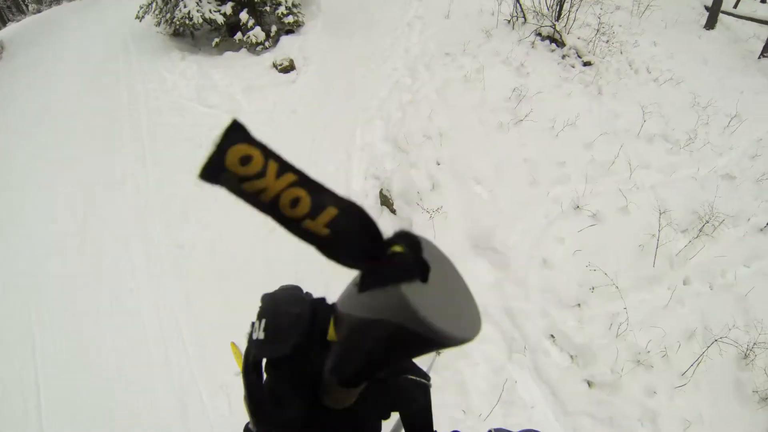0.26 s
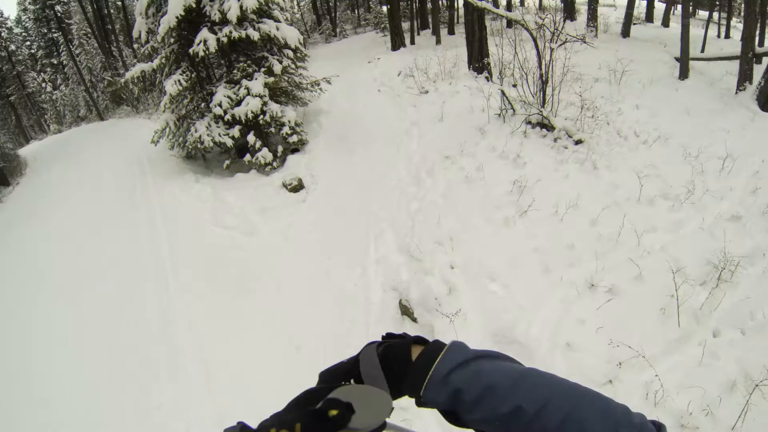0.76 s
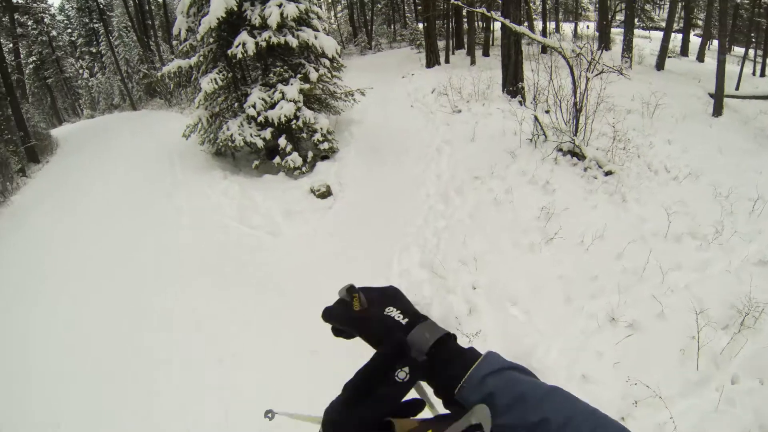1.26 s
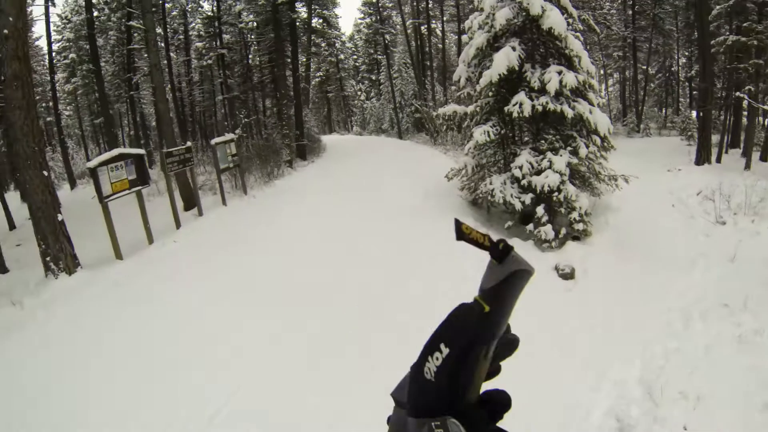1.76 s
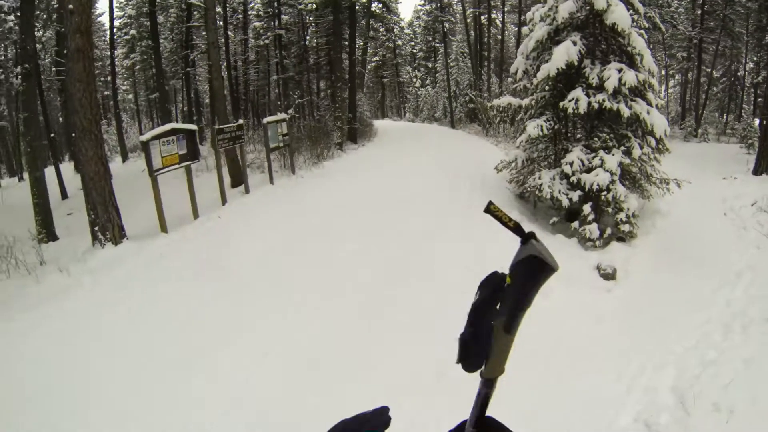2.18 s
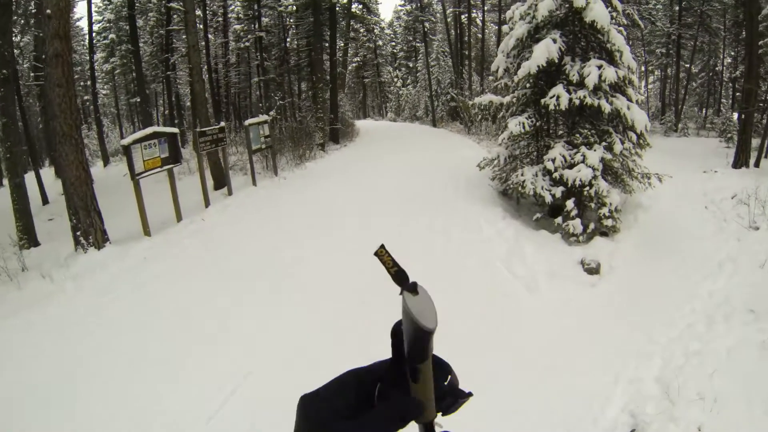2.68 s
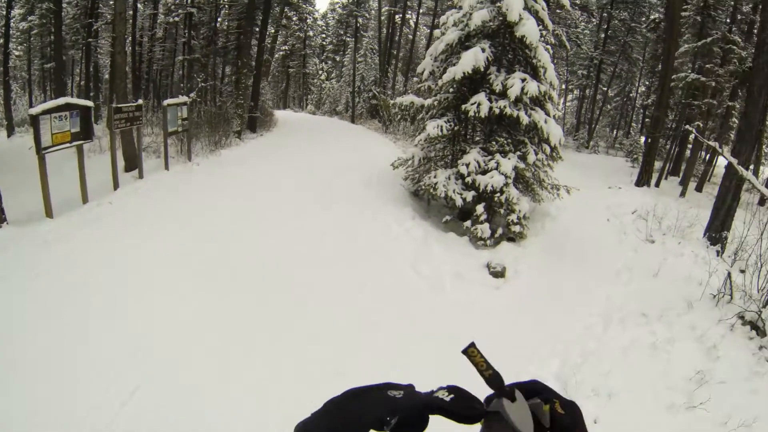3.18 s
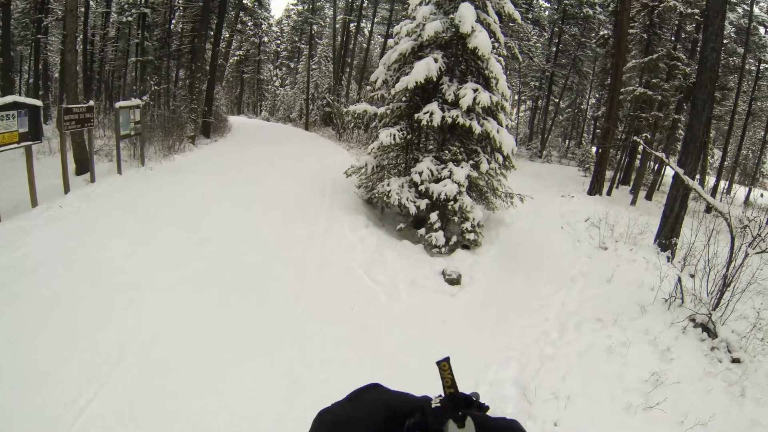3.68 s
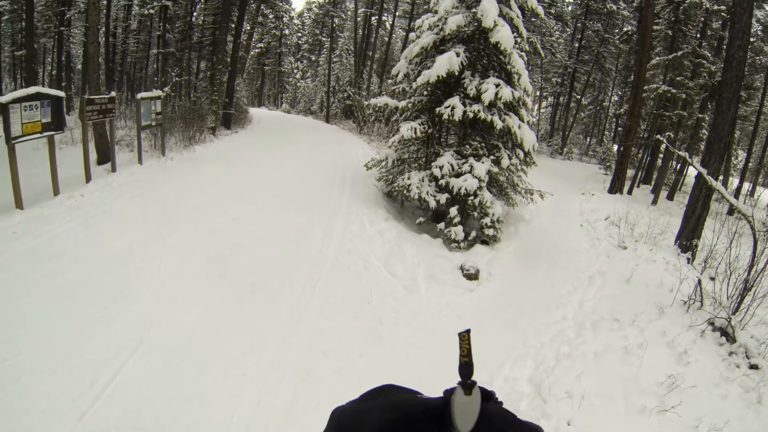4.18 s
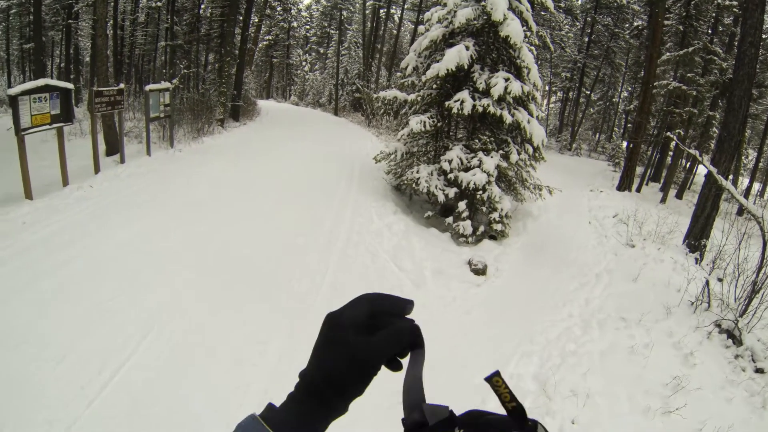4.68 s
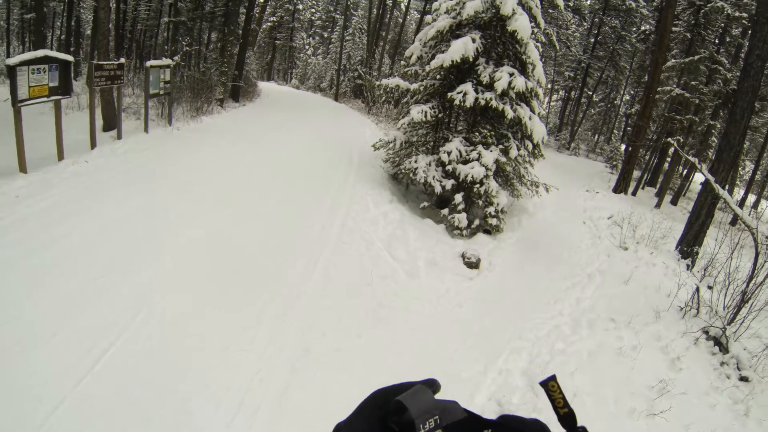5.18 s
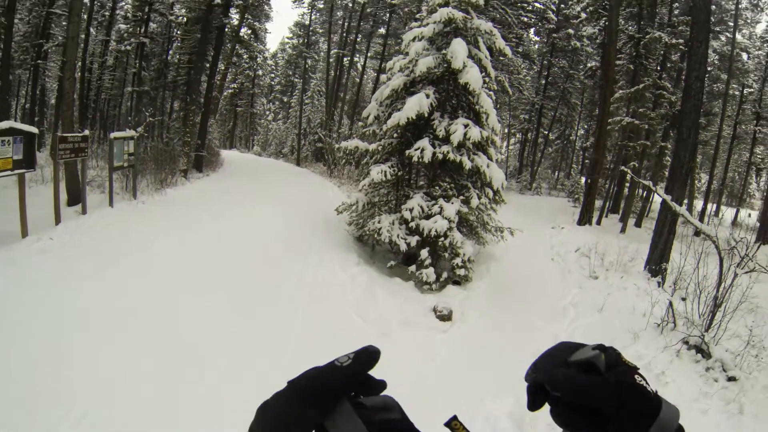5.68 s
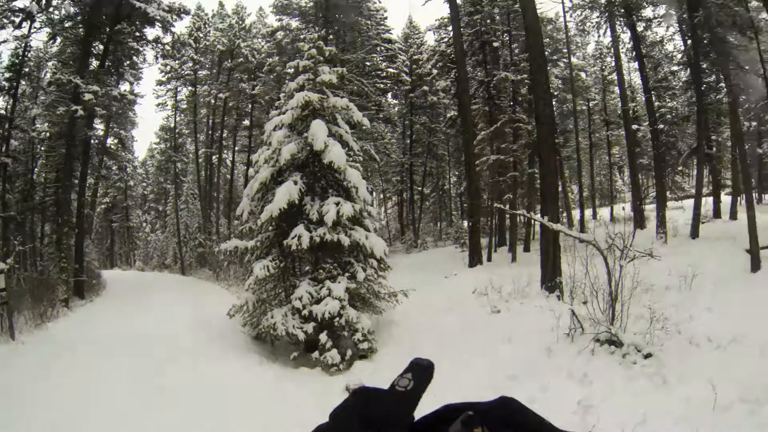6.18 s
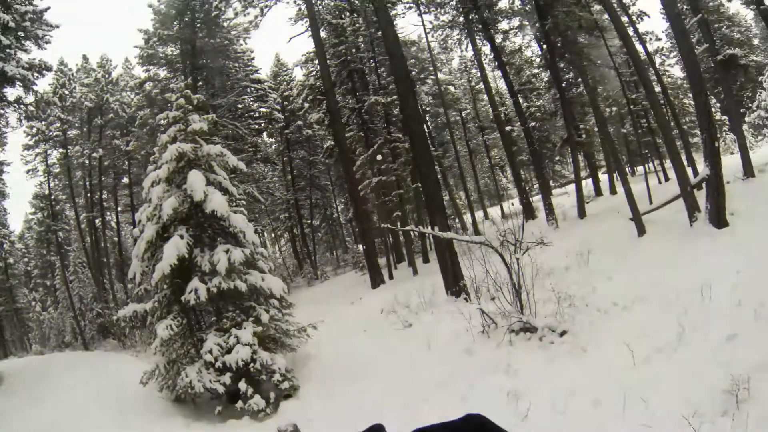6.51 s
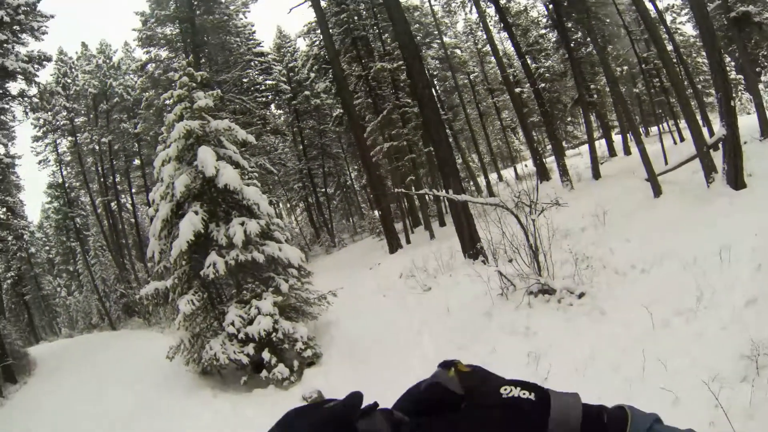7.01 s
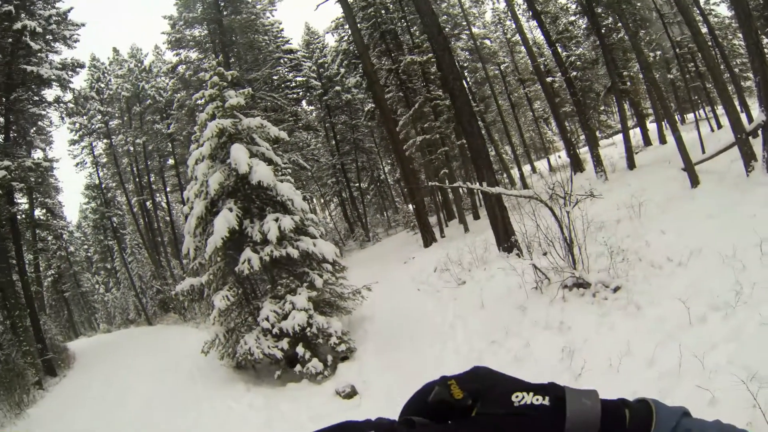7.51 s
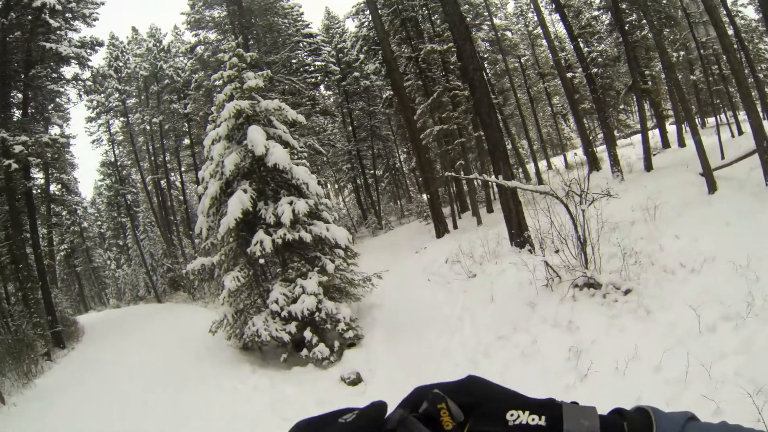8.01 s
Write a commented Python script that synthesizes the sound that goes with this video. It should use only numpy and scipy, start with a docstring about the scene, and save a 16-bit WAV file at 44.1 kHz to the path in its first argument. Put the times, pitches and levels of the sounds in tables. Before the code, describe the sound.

Low wind rumble and faint hiss under four sharp pole taps, a short ski slide, glove rustles and scattered clacks of gear.

```python
"""A skier pauses on a snowy forest trail, heard from a body-worn camera in a plastic case.
Wind rumbles on the case over hiss and a faint whine as four sharp pole taps echo among the trees.
A ski is pushed and glides out, crushing snow. The wind eases; gloves rub, grips and buckles click.
Near 4 s a hook-and-loop strap rips open. A plastic cap clacks, a soft knock rings the case,
and last the snow settles under a ski in four small crunches."""
import sys
import numpy as np
from scipy import signal
from scipy.fft import rfft, irfft, next_fast_len
from scipy.io import wavfile
from scipy.ndimage import uniform_filter1d, map_coordinates

SR = 44100
rng = np.random.default_rng(int(sys.argv[2]) if len(sys.argv) > 2 else 0)


def master(y):
    """Save y as 16-bit WAV."""
    cut = np.clip(np.atleast_2d(y).T, -1, 1)
    pcm = np.round(cut * 32767)  # scale
    wavfile.write(sys.argv[1], SR, pcm.astype(np.int16))


N = 365588

# Noise spectra. Each row: frequency in Hz, relative density in dB.
HISS_SPECTRUM = [(60, 11), (170, 8), (400, 4), (900, 0), (2200, -4.5), (4000, -8), (6500, -12),
                 (8400, -13.5), (10000, -16), (12500, -20), (15000, -27)]
WIND_SPECTRUM = [(10, -12.5), (20, 3.5), (32, -0.5), (50, -7.5), (72, -14), (100, -27), (150, -36.5),
                 (300, -44), (800, -101)]
SNOW_SPECTRUM = [(410, -44), (700, -27), (1050, -19.5), (1310, 0.5), (1410, -5.5), (1590, -1), (1710, -8),
                 (2220, -18), (2430, -15), (2700, -22), (3210, -23.5), (4670, -39), (7000, -51),
                 (9100, -74), (15400, -120)]

# Resonances. Each row: centre in Hz, width in Hz, relative gain in dB.
CASE_MODES = [(1366, 335, -4), (1578, 153, 3), (1970, 130, -13.5), (2250, 230, -9.5), (2830, 880, -25),
              (3223, 545, -2.5), (4790, 590, -12.5), (6300, 1200, -23), (8320, 470, -18.5),
              (9400, 1100, -35), (12000, 5000, -32)]
PACKED_SNOW_MODES = [(1230, 170, 2), (1570, 220, -3), (2300, 600, -23), (3300, 690, -16)]
GRIP_MODES = [(640, 210, -12.5), (1370, 92, 0.5), (1530, 130, -3), (1890, 180, -21), (2210, 250, -12),
              (3260, 440, -14), (4650, 400, -30)]
BUCKLE_MODES = [(1250, 85, -5), (1634, 220, -1), (1930, 160, -9), (2420, 210, -10), (2720, 200, -13),
                (3110, 170, -6.5), (3630, 330, -14), (4550, 310, -17), (5460, 380, -15), (7850, 1100, -22),
                (12500, 3000, -35)]
CAP_MODES = [(1260, 100, -4.5), (1534, 200, 2), (1900, 120, -12), (2360, 170, -15), (3320, 300, -1),
             (3940, 250, -38), (4650, 300, -20), (5530, 440, -30), (7400, 1000, -19), (9200, 520, -36),
             (11150, 900, -27)]
STRAP_MODES = [(1256, 115, -6.5), (1527, 120, 1), (2020, 140, -15), (2300, 120, -6), (2960, 220, -18),
               (3240, 420, 0), (4710, 260, -12), (6500, 420, -19.5), (8120, 480, -20), (9550, 510, -25.5),
               (12300, 2200, -37)]
POLE_MODES = [(850, 85, -22), (1284, 82, 2), (1560, 160, 0.5), (1860, 145, -4.5), (2430, 120, -6.5),
              (2850, 220, -1), (3225, 370, 2), (4800, 160, -21), (5470, 230, -26.5), (7700, 830, -37)]

# Tones of the electronics. Each row: frequency in Hz, level in dB.
WHINE_TONES = [(7027, -61), (14056, -61.5)]
# Air pushed past the case by the body. Each row: peak time in seconds, level in dB.
BODY_SWAYS = [(.24, -20), (.55, -25), (1.33, -22), (1.96, -23), (2.72, -25), (4.63, -26.5), (6.86, -29),
              (7.58, -30)]
# Glove or sleeve rubs. Each row: start in seconds, length in seconds, level in dB.
GLOVE_RUBS = [(1.865, 0.052, -40.5), (1.936, 0.065, -53), (2.52, 0.092, -52), (2.732, 0.15, -47.5),
              (2.895, 0.21, -54.5), (3.098, 0.31, -50.5), (3.392, .4, -56.5), (3.933, 0.049, -46),
              (4.045, .025, -44), (4.232, .28, -53.5), (4.643, 0.061, -47), (5.025, 0.038, -47),
              (5.188, 0.05, -49.5), (5.33, 0.068, -53.5), (6.03, .26, -55), (6.824, 0.43, -54)]
# Snow settling. Each row: start in seconds, level in dB.
SNOW_CRUNCHES = [(7.9294, -44.5), (7.9758, -47.5), (8.0778, -42), (8.1542, -44)]
# Ring of the knocked case. Each row: frequency in Hz, relative level in dB, T60 in seconds.
CASE_KNOCK_MODES = [(1420, -3.5, 0.052), (1490, -32, .02), (1610, 4.5, 0.076), (1910, -14, 0.029),
                    (2250, -5, 0.023), (3400, -11, 0.01)]
# Jolts of the mount. Each row: start in seconds, level in dB, frequency in Hz, T60 in seconds.
MOUNT_JOLTS = [(1.74, -9.5, 73, 0.14), (3.972, -6, 45, 0.1)]
# Light gear contacts, plus the cap clack's short echo off the trees at 6.122 s.
# Each row: start in seconds, level in dB, tilt in dB per octave, scrape in seconds.
CLICKS_AND_ECHO = [(.400, -31, -2.5, 0.0077), (0.4922, -35.5, -1, .0024), (1.6183, -35, 0.5, 0.0057),
                   (1.740, -34, -11, 0.005), (1.7631, -35.5, 0, 0.0012), (2.52, -39.5, -3.5, .01),
                   (2.633, -43, 3, 0.0067), (2.728, -39, 0.5, .009), (2.7692, -41, 1, 0.0061),
                   (3.938, -46, -3, .004), (4.0913, -48.5, 3.5, .0024), (4.2261, -41.5, -3, .0042),
                   (4.3362, -37, -0.5, .0061), (4.8329, -47.5, 4, .002), (5.0844, -48, 5.5, .0023),
                   (6.122, -42, -1, .006), (6.134, -43.5, 1, .008), (6.2963, -42, 3.5, 0.0011),
                   (7.047, -46, -8, .004), (7.4964, -43.5, 1, .01), (8.2364, -44.5, 2, .011)]
# Hard knocks of grip, buckle, cap. Each row: start in seconds, level in dB, scrape in seconds.
GEAR_CLACKS = [(1.728, -25.5, 0.0032), (3.8590, -26, 0.0021), (6.1053, -22, 0.0012)]
# Clumps of hooks tearing free. Each row: start in seconds, level in dB.
HOOK_SNAPS = [(4.1455, -33.5), (4.1532, -28.5)]
# Pole blows. Each row: start in seconds, level in dB, tilt in dB per octave.
POLE_TAPS = [(0.241, -28, -1), (0.5195, -23, -2), (0.7985, -20.5, -2), (1.0728, -15.5, 2)]


def amp(db):
    """Decibels to gain."""
    return 10 ** (np.asarray(db) / 20)


def unit_rms(x):
    """Scale to rms 1."""
    return x / np.sqrt(np.mean(x ** 2) + 1e-20)


def time_s(size=N):
    """Seconds at each sample."""
    return np.arange(size) / SR


def wobble(rate_hz):
    """Smooth random curve, rate_hz knots a second."""
    return map_coordinates(rng.standard_normal(int(N * rate_hz / SR) + 4), [time_s() * rate_hz])


def grains(rate_hz, spread_db):
    """Random impulses of uneven size."""
    hits = rng.random(N) < rate_hz / SR
    return hits * rng.standard_normal(N) * amp(spread_db * rng.standard_normal(N))


def trapezoid(start_s, length_s, attack_s, release_s):
    """Gain that rises, holds at 1 at most and falls to 0 within length_s."""
    t = time_s() - start_s
    return np.clip(np.minimum(t / attack_s, (length_s - t) / release_s), 0, 1)


def add(track, start_s, sound):
    """Mix a sound in at start_s."""
    span = track[round(start_s * SR):][:len(sound)]
    span += sound[:len(span)]


def spectrum(points):
    """Gain against frequency from (Hz, dB) points on a log axis."""
    points_hz, db = np.transpose(points)
    return lambda hz: amp(np.interp(np.log(hz + 1), np.log(points_hz), db))


def resonances(modes, tilt_db_oct=0):
    """Gain against frequency of steep peaks, tilted above the first."""
    def gain(hz):
        peaks = sum(amp(db) / (1 + (2 * (hz - mode_hz) / width_hz) ** 2)
                    for mode_hz, width_hz, db in modes)
        octaves = np.log2(np.maximum(hz / modes[0][0], 1))
        return peaks * amp(tilt_db_oct * octaves)
    return gain


def colour(x, gain):
    """Minimum-phase filter with the given gain curve."""
    size = 2 * next_fast_len(len(x) // 2 + 4096)
    hz = np.fft.rfftfreq(size, 1 / SR)
    cepstrum = irfft(np.log(np.maximum(gain(hz), 1e-6)))
    cepstrum[1:size // 2] *= 2
    cepstrum[size // 2 + 1:] = 0
    return irfft(rfft(x, size) * np.exp(rfft(cepstrum)), size)[:len(x)]


def noise(gain):
    """Coloured noise at rms 1."""
    return unit_rms(colour(rng.standard_normal(N), gain))


def contact(modes, tilt_db_oct, scrape_s, grit):
    """A blow plus a decaying scrape, weighted by grit, rings a body. Energy: 10 ms at rms 1."""
    t = time_s(SR // 8)
    scrape = rng.standard_normal(len(t)) * np.exp(-t / max(scrape_s, 1e-4))
    force = grit * scrape / np.linalg.norm(scrape)
    force[0] += 1

    def gain(hz):  # flattens the force's spectrum, so the body sets the colour
        power = uniform_filter1d(np.abs(rfft(force, 2 * len(hz) - 2)) ** 2, size=80)
        return resonances(modes, tilt_db_oct)(hz) / np.sqrt(np.abs(power) + 1e-9)

    ring = colour(force, gain)
    return ring / np.linalg.norm(ring) * np.sqrt(SR / 100)


def camera_noise(gate_hz=12):
    """Steady hiss, a trace of air in the case, and an electronic whine switching on and off."""
    hiss = amp(-47.5) * noise(spectrum(HISS_SPECTRUM))
    air = amp(-58.5) * noise(resonances(CASE_MODES))
    t = time_s()
    switched_on = np.cos(2 * np.pi * gate_hz * (t - 0.03)) > 0.1
    gate = uniform_filter1d(switched_on.astype(float), SR // 200)
    drift_rad = 1.1 * wobble(rate_hz=70)
    whine = sum(amp(db) * np.sin(2 * np.pi * hz * t + drift_rad) for hz, db in WHINE_TONES)
    return hiss + air + gate * whine


def wind(moving_db=-22.5, rest_db=-30, settle_s=2.8, sway_width_s=0.13):
    """Air buffets the closed case: deep rumble that eases as the skier stops and swells with sways."""
    t = time_s()
    speed = np.clip(1 - (t / settle_s) ** 2, 0, 1)
    flow = amp(rest_db + (moving_db - rest_db) * speed)
    sways = sum(amp(db) * np.exp(-((t - peak_s) / sway_width_s) ** 2) for peak_s, db in BODY_SWAYS)
    eddies = amp(1.2 * wobble(rate_hz=6.4))
    return np.hypot(flow, sways) * eddies * noise(spectrum(WIND_SPECTRUM))


def glove_rustle(rest_db=-59.5):
    """Fabric drags past the case in fine uneven grains and is never quite still."""
    rubbing = sum(amp(db) * trapezoid(start_s, length_s, attack_s=0.011, release_s=0.021)
                  for start_s, length_s, db in GLOVE_RUBS)
    fibres = grains(rate_hz=2800, spread_db=4) * amp(2.5 * wobble(rate_hz=60))
    fabric = unit_rms(colour(fibres, resonances(CASE_MODES, tilt_db_oct=-0.7)))
    return np.hypot(rubbing, amp(rest_db)) * fabric


def snow_crunches():
    """The weight shifts and packed snow gives way in small dull steps."""
    out = np.zeros(N)
    for start_s, db in SNOW_CRUNCHES:
        add(out, start_s, amp(db) * contact(PACKED_SNOW_MODES, tilt_db_oct=2, scrape_s=0.005, grit=2.7))
    return out


def case_knocks(knock_s=6.778, knock_db=-17.5):
    """A padded knock scuffs and rings the case; jolts rock it on its mount."""
    out, t = np.zeros(N), time_s(SR // 3)

    def ring(hz, t60_s, attack_s):
        return np.sin(2 * np.pi * hz * t) * amp(-60 * t / t60_s) * (1 - np.exp(-t / attack_s))

    knock = sum(amp(db) * ring(hz, t60_s, attack_s=0.0017) for hz, db, t60_s in CASE_KNOCK_MODES)
    scuff = contact(CASE_MODES, tilt_db_oct=0, scrape_s=0.0033, grit=2)
    add(out, knock_s, amp(knock_db) * knock)
    add(out, knock_s, amp(-41.5) * scuff)
    for start_s, db, hz, t60_s in MOUNT_JOLTS:
        add(out, start_s, amp(db) * ring(hz, t60_s, attack_s=0.0075))
    return out


def gear_clicks():
    """Gear clicks and the cap clack's echo sound through the case; hard knocks ring the struck part."""
    out = np.zeros(N)
    for start_s, db, tilt_db_oct, scrape_s in CLICKS_AND_ECHO:
        grit = scrape_s / 0.0011  # longer ones are mostly scrape
        add(out, start_s, amp(db) * contact(CASE_MODES, tilt_db_oct, scrape_s, grit))
    for (start_s, db, scrape_s), modes in zip(GEAR_CLACKS, (GRIP_MODES, BUCKLE_MODES, CAP_MODES)):
        add(out, start_s, amp(db) * contact(modes, tilt_db_oct=0, scrape_s=scrape_s, grit=1.27))
    return out


def strap_rip(start_s=4.111, length_s=0.101, build_s=0.034, level_db=-30, slack_db=-9, rows_per_s=140):
    """The pull builds and hooks let go row by row in uneven bursts; two clumps snap free."""
    slack = np.clip(1 - (time_s() - start_s) / build_s, 0, 1)
    gate = trapezoid(start_s, length_s, attack_s=0.002, release_s=0.002)
    pull = amp(level_db + slack_db * slack) * gate
    rows_peeled = np.cumsum(rows_per_s * amp(2.5 * wobble(rate_hz=130))) / SR
    bursts = amp(-20 * (rows_peeled % 1) + 1.2 * wobble(rate_hz=150))
    hooks = bursts * grains(rate_hz=8600, spread_db=1)
    out = pull * unit_rms(colour(hooks, resonances(STRAP_MODES)))
    for snap_s, db in HOOK_SNAPS:
        add(out, snap_s, amp(db) * contact(STRAP_MODES, tilt_db_oct=-0.1, scrape_s=0.0022, grit=3.5))
    return out


def ski_slide(push_s=1.289, push_db=-24, glide_db=-32.5):
    """The ski is loaded, glides out and slows: crystals crush under it and the pack rumbles softly."""
    load_db_per_s, unload_db_per_s, slowing_db_per_s = 238, 212, 37
    t = time_s() - push_s
    before_s, after_s = np.maximum(-t, 0), np.maximum(t, 0)
    push = amp(push_db - load_db_per_s * before_s - unload_db_per_s * after_s)
    gate = trapezoid(push_s, length_s=0.42, attack_s=0.024, release_s=0.18)
    glide = amp(glide_db - slowing_db_per_s * after_s) * gate
    crystals = unit_rms(colour(grains(rate_hz=4600, spread_db=1.5), spectrum(SNOW_SPECTRUM)))
    pack_gain = spectrum([(40, -20), (110, 10.5), (300, -11.5), (900, -16), (2000, -45)])
    pack = unit_rms(colour(grains(rate_hz=1800, spread_db=5.5), pack_gain))
    return np.hypot(push, glide) * (crystals + amp(-10) * pack)


def forest_echo(x, echo_s=0.0167, echo_db=-13.5, scatter_db=-17, t60_s=0.3):
    """Adds one clear echo from a few metres away and thin scatter from the trunks."""
    t = time_s(SR // 2)
    scatter = rng.standard_normal(len(t)) * amp(-60 * t / t60_s) * np.minimum(t / echo_s, 1)
    response = amp(scatter_db) * scatter / np.linalg.norm(scatter)
    response[round(echo_s * SR)] += amp(echo_db)
    return x + signal.fftconvolve(x, response)[:N]


def pole_taps():
    """Short, hard blows ring the pole, each stronger than the last."""
    out = np.zeros(N)
    for start_s, db, tilt_db_oct in POLE_TAPS:
        add(out, start_s, amp(db) * contact(POLE_MODES, tilt_db_oct, scrape_s=0.0003, grit=3))
    return out


def scene():
    """All sources at one microphone."""
    gear = forest_echo(pole_taps()) + gear_clicks() + case_knocks() + strap_rip() + glove_rustle()
    return (gear + ski_slide() + snow_crunches() + wind() + camera_noise())[None]


def record(dry, cutoff_hz=15200):
    """The camera keeps nothing above its band limit."""
    size = next_fast_len(N + SR // 2)
    passband = np.fft.rfftfreq(size, 1 / SR) < cutoff_hz
    return irfft(rfft(dry, size) * passband, size)[:, :N]


dry = scene()
out = record(dry)
master(out)
```